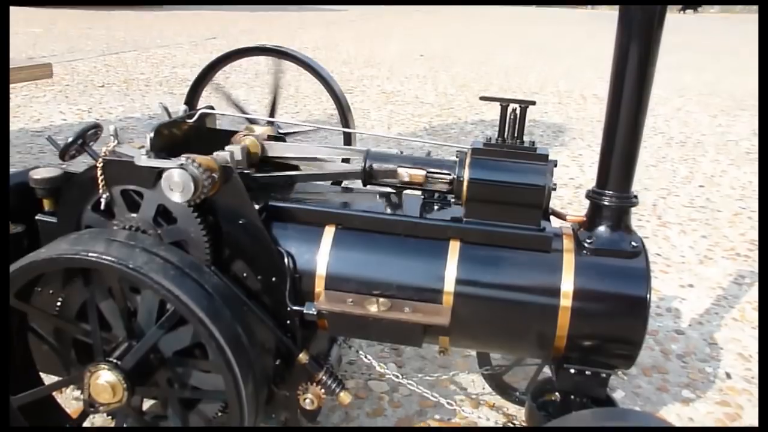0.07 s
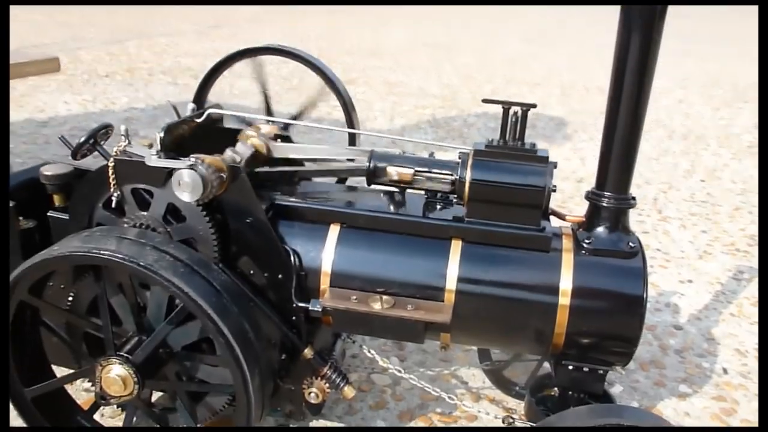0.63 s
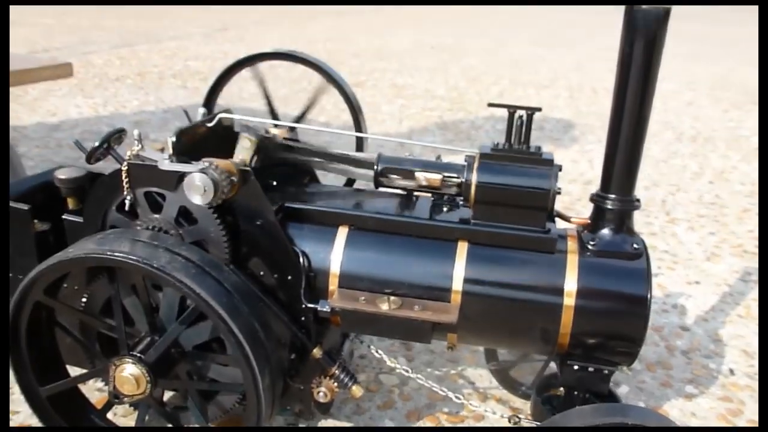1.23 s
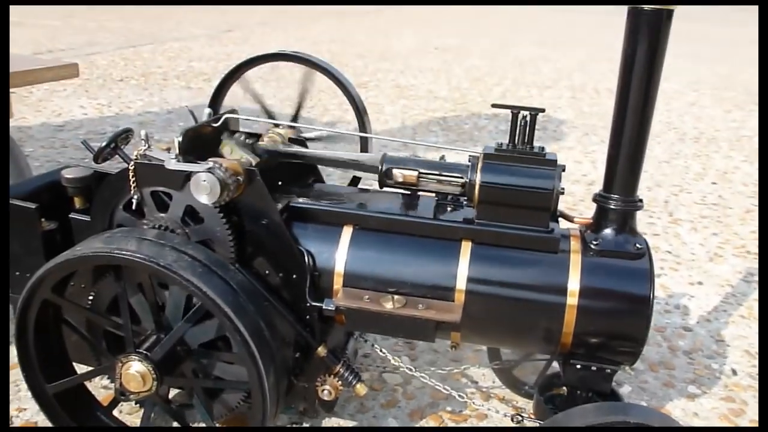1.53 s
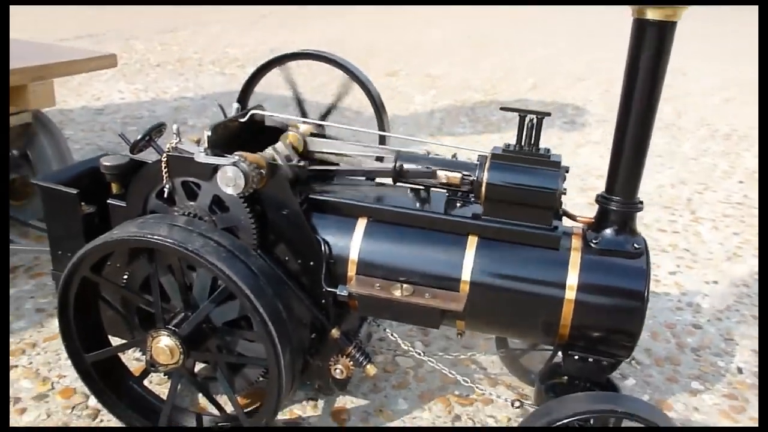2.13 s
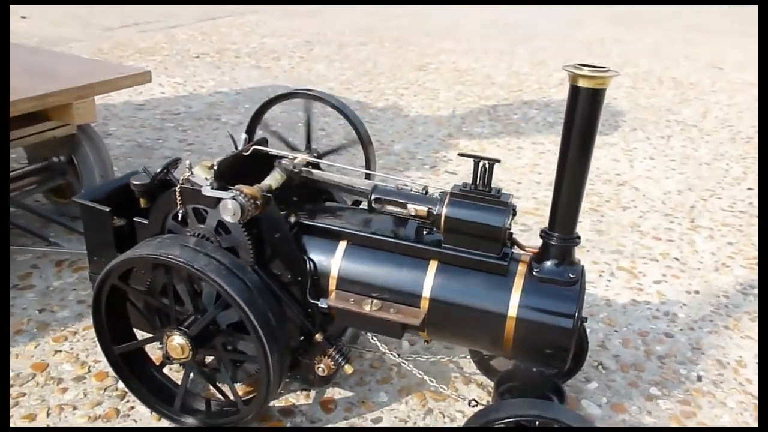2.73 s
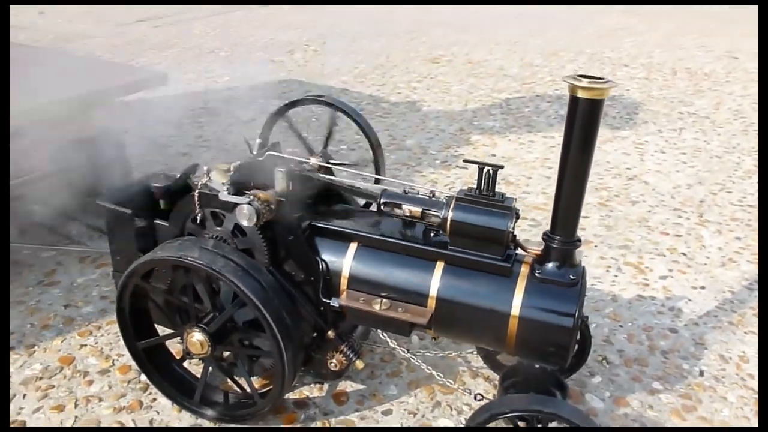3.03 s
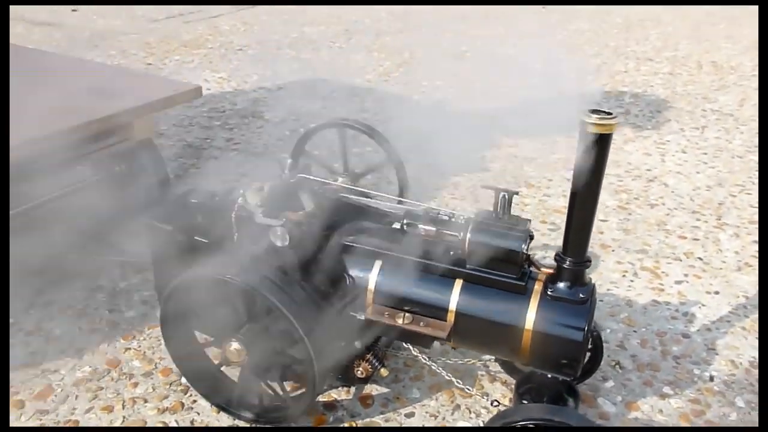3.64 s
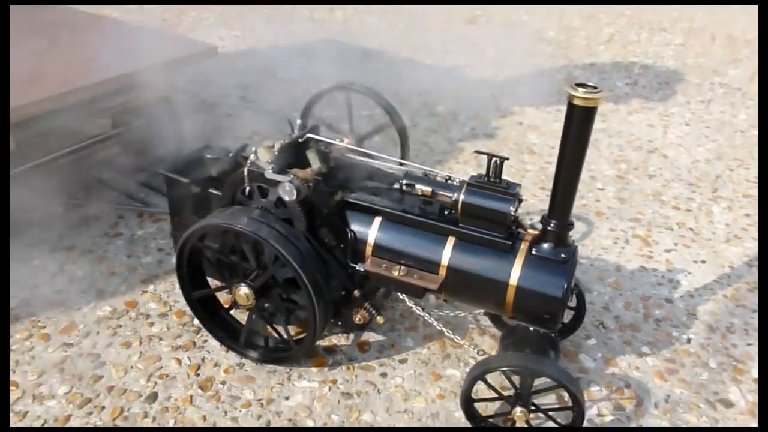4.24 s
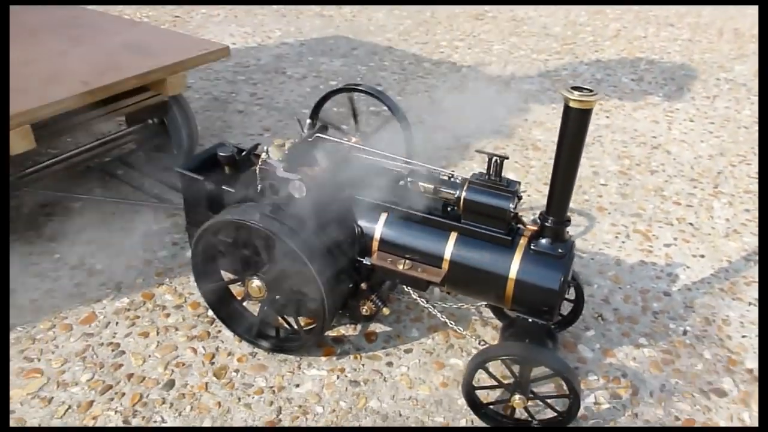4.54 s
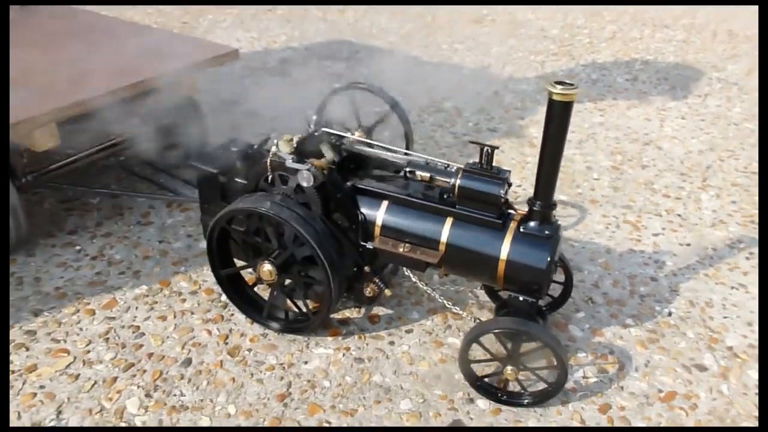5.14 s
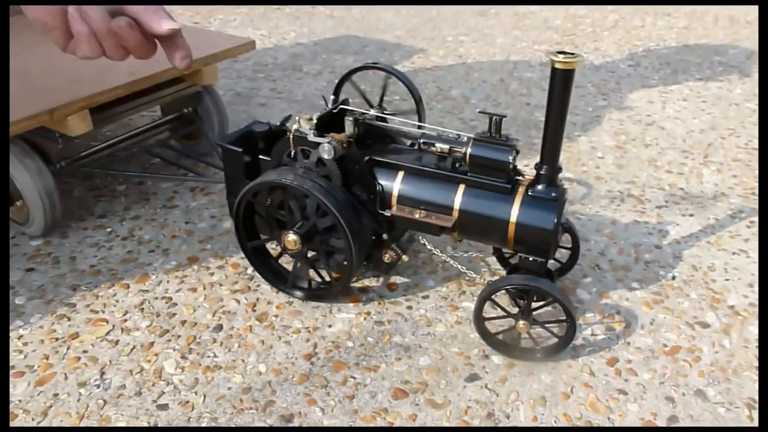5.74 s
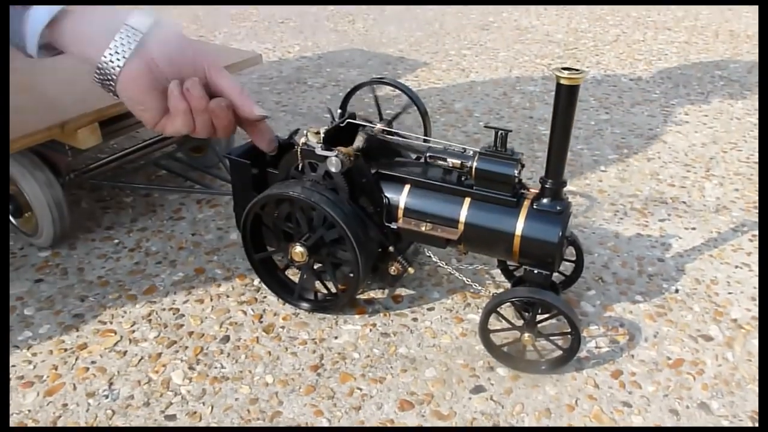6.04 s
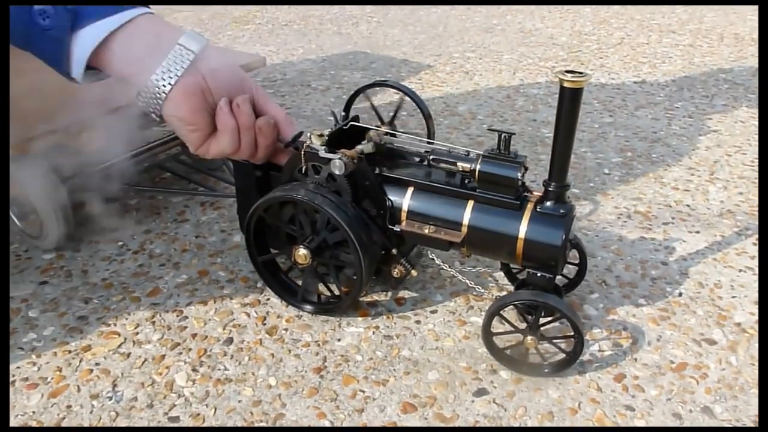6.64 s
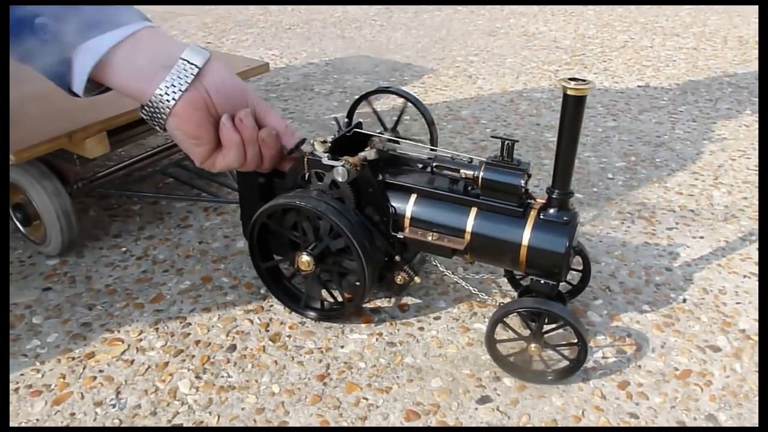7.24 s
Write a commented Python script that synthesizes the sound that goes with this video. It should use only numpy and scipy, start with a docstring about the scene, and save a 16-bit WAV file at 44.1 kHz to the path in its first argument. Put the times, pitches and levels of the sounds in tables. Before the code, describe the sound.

A gas burner roars and sings inside a model steam engine ticking over with rapid, spitting chuffs in a rising breeze.

```python
"""First you hear a gas burner roaring, hooting and singing in the flue of a small model traction engine.
Its gas jet hisses, and wet steam chuffs up the chimney twice a turn, spitting drops of water.
The engine ticks over outdoors and slowly gains a little speed; its loose rods click now and then.
A breeze grows into gusts that buffet the left and right microphones."""
import sys
import numpy as np
from scipy import signal
from scipy.fft import rfft, irfft
from scipy.io import wavfile

SR = 44100
rng = np.random.default_rng(int(sys.argv[2]) if len(sys.argv) > 2 else 0)


def dump(signal):
    """Clip the signal to [-1, 1] and save it as 16-bit WAV at the path in sys.argv[1]."""
    limited = np.clip(np.atleast_2d(signal).T, -1, 1)
    pcm = np.round(limited * 32767).astype(np.int16)
    wavfile.write(sys.argv[1], SR, pcm)


N = 329868
TIME = np.arange(N) / SR


def amp(db):
    """Turns decibels into a gain."""
    return 10 ** (np.asarray(db) / 20)


def unit(x):
    """Scales a signal to an average strength (rms) of 1."""
    return x / np.sqrt(np.mean(x ** 2) + 1e-20)


def curves(rows):
    """Joins the rows of a time table with straight lines, giving one curve for each value column."""
    seconds, *columns = np.transpose(rows)
    return [np.interp(TIME, seconds, column) for column in columns]


def along_hz(points):
    """Joins the rows of a frequency table into one curve, on a log frequency axis."""
    hz, value = np.transpose(points)
    return np.interp(np.log(np.fft.rfftfreq(N, 1 / SR) + 1), np.log(hz + 1), value)


def noise(points):
    """Noise of strength 1, coloured by a frequency table."""
    return unit(irfft(rfft(rng.standard_normal(N)) * amp(along_hz(points)), N))


def wander(rate_hz):
    """A random wobble of strength 1, mostly slower than the given rate."""
    rolloff = (1 + (np.fft.rfftfreq(N, 1 / SR) / rate_hz) ** 2) ** 2
    return unit(irfft(rfft(rng.standard_normal(N)) / rolloff, N))


def resonate(x, hz, width_hz):
    """A resonance whose pitch may move: shift the sound down to 0 Hz, smooth it, shift it back."""
    turn = np.exp(2j * np.pi * np.cumsum(hz * np.ones(N)) / SR)
    pole = np.exp(-np.pi * width_hz / SR)
    return 2 * (turn * signal.lfilter([1 - pole], [1, -pole], x / turn + 1e-18)).real


def ring(x, hz, width_hz, skirt_hz):
    """A narrow resonance, then a wider one that trims its sides."""
    return resonate(resonate(x, hz, width_hz), hz, skirt_hz)


def clicks(rows):
    """One click for each row of time and level."""
    seconds, db = np.transpose(rows)
    return np.bincount(np.clip(np.round(seconds * SR).astype(int), 0, N - 1), amp(db), N)


def bursts(rows, decay_s):
    """One short, dying puff of noise for each row of time and level."""
    out, t = np.zeros(N), np.arange(SR // 20) / SR
    for start, db in rows:
        puff = rng.standard_normal(len(t)) * np.exp(-t / decay_s)
        part = out[max(round(start * SR), 0):][:len(t)]
        part += (amp(db) * puff / np.linalg.norm(puff))[:len(part)]
    return out


def arches(rows):
    """One smooth rise and fall in gain for each row of middle time, length and level."""
    gains = (amp(db) * np.cos(np.pi * np.clip((TIME - middle) / length, -.5, .5))
             for middle, length, db in rows)
    return np.sqrt(sum(gain ** 2 for gain in gains))


# The flame sounds weaker as the listener backs away. Each row: time in seconds, roar in dB, hoot in dB.
FLAME = [(0, -28.5, -20), (1.2, -27, -18.5), (2.25, -28.5, -21), (2.62, -25.5, -18), (3.05, -28, -22),
         (3.7, -25.5, -18.5), (4.1, -27, -23), (4.28, -24, -20), (4.45, -29, -26.5), (4.62, -28.5, -28.5),
         (4.75, -29.5, -20), (5.2, -32, -27), (5.52, -30, -24), (5.8, -31, -26.5), (6.45, -32.5, -24.5),
         (6.9, -32.5, -26), (7.38, -31, -23.5), (7.48, -30.5, -25)]
# The colour of the roar. Each row: frequency in Hz, level in dB.
ROAR_COLOUR = [(20, -39), (50, -17.5), (120, -5.5), (200, -3.5), (290, 0), (480, -0.5), (720, 1.5),
               (1000, -8), (1150, -33.5), (1300, -12), (1480, -5.5), (1750, -32.5), (2500, -51.5),
               (8000, -58.5)]
# The flue's two notes sag slightly. Each row: time in seconds, hoot in Hz, singing note in Hz.
FLUE_NOTES = [(0, 863, 1527), (1.5, 861, 1523), (3, 854, 1508), (4.6, 855, 1519), (5.7, 861, 1521),
              (7.48, 861, 1525)]
# Brief, sharp-edged bursts of the low hoot. Each row: start in seconds, level in dB.
HOOT_ACCENTS = [(0.187, -17), (0.591, -20.5), (0.701, -19), (1.35, -17.5), (2.037, -12), (2.637, -21.5),
                (2.967, -15), (2.998, -15), (3.059, -18), (3.463, -16), (7.084, -14), (7.179, -16)]


def burner(roar_db=2, hoot_db=-1, accent_db=42, flicker_db=0.9):
    """The swirling flame roars and sounds a hoot, the lowest note of the flue (the tube it burns in)."""
    roar_level, hoot_level = curves(FLAME)
    hoot_hz, _ = curves(FLUE_NOTES)
    flicker = amp(flicker_db * wander(rate_hz=14))
    hoot = unit(ring(flicker * rng.standard_normal(N), hoot_hz, width_hz=60, skirt_hz=480))
    accents = amp(accent_db) * ring(clicks(HOOT_ACCENTS), hoot_hz, width_hz=90, skirt_hz=600)
    return noise(ROAR_COLOUR) * amp(roar_level + roar_db) + hoot * amp(hoot_level + hoot_db) + accents


# The flue's upper note hums on between swells. Each row: time in seconds, level in dB.
HUM = [(0, -27.5), (.7, -30), (1, -35), (1.45, -32), (2.4, -37), (2.88, -42), (3.4, -40.5), (3.95, -41),
       (4.3, -33.5), (4.55, -41.5), (5.05, -32), (5.27, -40), (5.55, -36), (5.8, -42), (6.05, -28.5),
       (6.35, -41.5), (6.6, -30.5), (7.48, -37)]
# Now and then it sings out. Each row: loudest moment in seconds, length in seconds, level in dB.
SWELLS = [(.03, 0.15, -22), (.14, 0.064, -20), (.225, 0.11, -24.5), (.36, .12, -21), (.51, .1, -20.5),
          (.62, 0.09, -22.5), (.72, 0.12, -24.5), (1.11, .07, -26.5), (1.65, 0.14, -30), (1.77, .08, -28.5),
          (1.95, 0.19, -30), (2.65, .06, -28), (3.29, 0.14, -27.5), (4.73, .06, -26.5),
          (4.845, 0.061, -19.5), (4.93, .12, -27), (5.09, .08, -28.5), (5.67, .08, -17), (5.94, 0.1, -28.5),
          (6.09, .08, -26.5), (6.22, 0.067, -24), (7.44, .08, -29)]


def singing_flue(hum_waver_db=2.5, pitch_waver=0.00501, flutter_db=3, fuzz_db=-10, octave_db=-15):
    """The flue's upper resonance almost keeps itself going: a fuzzy, wavering note that comes and goes."""
    hum_level, = curves(HUM)
    hum = amp(hum_level) * unit(amp(hum_waver_db * wander(rate_hz=20)))
    level = 20 * np.log10(np.hypot(hum, arches(SWELLS)))
    _, hz = curves(FLUE_NOTES)
    hz = hz * (1 + 0.000311 * (level - level.mean()))  # a little higher when driven harder
    cycles = np.cumsum(hz * (1 + pitch_waver * wander(rate_hz=45.6))) / SR
    tone = unit(np.sin(2 * np.pi * cycles) * amp(flutter_db * wander(rate_hz=54)))
    fuzz = unit(resonate(rng.standard_normal(N), hz, width_hz=150))
    note = resonate(amp(level) * (tone + amp(fuzz_db) * fuzz), hz, width_hz=150)
    octave = (signal.hilbert(note) ** 2).real  # strongest in the loudest swells
    return note + amp(octave_db) * octave


def flue_hollows(x, lower_depth=0.65, upper_depth=0.99):
    """Just below and above its singing note, the flue partly cancels the flame's sound."""
    x = x - lower_depth * resonate(x, hz=1390, width_hz=80)
    return x - upper_depth * resonate(x, hz=1700, width_hz=150)


# How loud the gas jet is. Each row: time in seconds, hiss in dB, whistle in dB.
JET_LEVELS = [(0, -60, -59.5), (1, -58, -60), (1.8, -61, -52.5), (2.4, -60.5, -47.5), (3, -54, -45),
              (3.7, -51, -45), (4.3, -55, -45.5), (4.5, -60, -48), (4.85, -50.5, -45), (5.3, -59, -50),
              (5.7, -55, -46.5), (6.6, -57.5, -46), (7.48, -53.5, -46)]
# The colour of its hiss. Each row: frequency in Hz, level in dB.
JET_COLOUR = [(800, -16), (1800, -13), (2500, -11), (3500, -0.5), (4400, 8.5), (5200, -0.5), (6500, -3),
              (8000, -6)]


def gas_jet(hiss_db=8, whistle_db=-2):
    """Gas rushes out of the jet with a hiss and one fuzzy whistle."""
    hiss_level, whistle_level = curves(JET_LEVELS)
    whistle = unit(ring(rng.standard_normal(N), hz=2890, width_hz=110, skirt_hz=400))
    return noise(JET_COLOUR) * amp(hiss_level + hiss_db) + whistle * amp(whistle_level + whistle_db)


# The engine gathers a little speed. Each row: time in seconds, chuffs per second.
SPEED = [(0, 11.337), (1, 11.091), (1.5, 12.002), (3.1, 12.528), (3.6, 13.564), (4.3, 13.134),
         (4.9, 13.288), (6, 13.946), (7.48, 12.917)]
# The pressure behind the chuffs. Each row: time in seconds, steam level in dB.
PRESSURE = [(0, -45.5), (1, -43.5), (1.6, -45.5), (2.2, -44), (2.5, -41), (2.9, -44.5), (3.35, -43),
            (4.05, -46), (4.25, -39), (4.5, -47), (4.8, -45), (5.4, -49.5), (6, -45.5), (6.65, -48),
            (7.48, -47.5)]


def steam_flow(leak, sharp_rise_s=0.0011, gentle_rise_s=0.012, hold_s=0.024, fall_s=0.064, shut_s=0.014):
    """Twice a turn a valve opens, the steam pressure holds and then sags, and the valve shuts."""
    rate, = curves(SPEED)
    level, = curves(PRESSURE)
    crank = (0.047 + np.cumsum(rate) / SR) % 2  # counted in strokes, two to a turn
    changeover = 0.964  # one end of the cylinder opens early and gently
    gentle = crank >= changeover
    age_s = (crank - gentle * changeover) / rate
    remaining_s = (np.where(gentle, 2, changeover) - crank) / rate
    opening = 1 - np.exp(-age_s / np.where(gentle, gentle_rise_s, sharp_rise_s))
    pressure = np.exp(-np.maximum(age_s - hold_s, 0) / fall_s)
    shutting = np.clip(remaining_s / shut_s, 0, 1) ** 2
    level = level - 0.05 * gentle + 0.7 * wander(rate_hz=12)  # the chuffs are slightly uneven
    return amp(level) * (leak + (1 - leak) * opening * pressure * shutting)


# The chimney's six resonances. Each row: frequency in Hz, width in Hz, level in dB.
CHIMNEY_RINGS = [(1930, 120, -12), (2257, 114, 1.5), (4295, 175, -0.5), (4550, 220, -11), (6374, 220, -8),
                 (6690, 250, -4.5)]
# The treble shifts as the listener moves. Each row: time in seconds, pitch factors for rings 3 and 6.
RING_DRIFT = [(0, 1.04, 1.03), (1.2, 1.04, 1.045), (2.1, 1.038, 1.035), (2.6, 1.02, 1.003),
              (3.2, 1.003, .968), (4.4, 1.003, .952), (5.1, 1.005, .962), (5.8, 1.005, 1.0),
              (7.48, 1.008, .992)]
# Its strength shifts too. Each row: time in seconds, dB added to rings 3, 5 and 6.
RING_LIFT = [(0, -3, 6, -7.5), (1.8, -5.5, 1, -4.5), (2.5, 1.5, -1, 2), (4.3, 1, -7, -5),
             (5.2, 0, -3.5, -1), (7.48, 0, -6, 0)]
# The colour of the sound that passes straight out. Each row: frequency in Hz, level in dB.
STEAM_COLOUR = [(1000, -25), (2000, -16.5), (3300, 8), (4300, -2), (5200, 7.5), (6000, 10.5), (7000, -1),
                (8000, 3.5)]


def chimney(x, direct_db=-18.5):
    """Steam and water set the chimney ringing; some of their sound passes straight out."""
    shift_3, shift_6 = curves(RING_DRIFT)
    lift_3, lift_5, lift_6 = curves(RING_LIFT)
    shifts = [1, 1, shift_3, 1, 1, shift_6]
    lifts = [0, 0, lift_3, 0, lift_5, lift_6]
    out = amp(direct_db) * irfft(rfft(x) * amp(along_hz(STEAM_COLOUR)), N)
    for (hz, width_hz, db), shift, lift in zip(CHIMNEY_RINGS, shifts, lifts):
        out += amp(db + lift) * ring(x, hz * shift, width_hz, skirt_hz=1300)
    return out


# Wet, leaky steam. Each row: time in seconds, crackle in dB, share of flow leaking between chuffs (0-1).
WETNESS = [(0, 0.5, 0.6), (1, -1, 0.56), (1.8, 0.5, 0.77), (2.1, -3, 0.32), (2.8, -5.5, 0.14),
           (3.3, 1.5, 0.23), (4.3, 0.5, 0.44), (4.55, -0.5, 0.33), (5.4, 3, 0.3), (6, 2.5, 0.4),
           (6.4, 2, 0.1), (7.48, 2, 0.2)]
# Big drops burst in the chimney. Each row: start in seconds, level in dB.
SPITS = [(1.2529, -14.5), (1.5851, -13), (1.7905, -20), (2.407, -15.5), (2.5206, -17.5), (3.0048, -16.5),
         (3.1208, -16), (3.4325, -18.5), (3.6676, -11), (3.7249, -16.5), (3.8158, -15.5), (3.9583, -13),
         (4.0892, -15.5), (4.2083, -8), (4.2434, -26.5), (4.2592, -7.5), (4.327, -11), (4.3552, -12.5),
         (4.803, -16.5), (5.7368, -23.5), (5.8165, -13.5), (6.0407, -17.5), (7.4552, -13.5)]
# Longer splutters of water. Each row: start in seconds, length in seconds, level in dB.
SPLUTTERS = [(1.253, 0.027, -32.5), (1.569, 0.05, -36), (1.783, .022, -32.5), (3.664, 0.051, -32.5),
             (4.181, 0.028, -40), (4.28, 0.03, -37), (4.33, 0.013, -37), (4.796, 0.011, -36),
             (6.198, 0.015, -32.5)]


def exhaust(steam_db=17.5, drops_per_s=170, drops_db=14.5, snap_db=19.5, spray_db=20, splutter_db=13):
    """Wet steam hisses and crackles with each chuff; larger drops spit and splutter."""
    crackle_level, leak = curves(WETNESS)
    size_db = 6 * np.minimum(rng.exponential(1, N), 2.8)  # many small droplets, a few large ones
    sizes = amp(size_db) * rng.choice([-1, 1], N)
    drops = unit(sizes * (rng.random(N) < drops_per_s / SR))
    flow = steam_flow(leak)
    chuffs = flow * (amp(steam_db) * rng.standard_normal(N) + amp(crackle_level + drops_db) * drops)
    water = sum(amp(db) * np.sqrt(np.sin(np.pi * np.clip((TIME - start) / length, 0, 1)).clip(0))
                for start, length, db in SPLUTTERS)
    rough_hiss = unit(rng.standard_normal(N) * amp(1.4 * wander(rate_hz=350)))
    splutters = amp(splutter_db) * water * rough_hiss
    spits = amp(snap_db) * clicks(SPITS) + amp(spray_db) * bursts(SPITS, decay_s=0.0091)
    return chimney(chuffs + splutters + spits)


# Sharp ticks from the moving rods. Each row: start in seconds, level in dB.
TICKS = [(.8383, -12), (1.0298, -24), (1.7589, -23), (3.0421, -22), (3.1608, -11.5), (3.6297, -25.5),
         (3.8597, -18.5), (4.3891, -19.5), (7.4653, -18.5)]


def rod_ticks(tick_db=19, rebound_s=0.0013, rebound_db=-10):
    """A loose rod takes up its slack with a dry tick and a quick rebound."""
    knocks = clicks(TICKS)
    rebounds = amp(rebound_db) * np.roll(knocks, round(rebound_s * SR))
    return amp(tick_db) * ring(knocks + rebounds, hz=3900, width_hz=1300, skirt_hz=3000)


# The breeze grows stronger. Each row: time in seconds, level in dB.
BREEZE = [(0, -59), (1.1, -63), (1.4, -49), (1.85, -44), (2.55, -52), (3.3, -53), (4.7, -41.5),
          (5.5, -42.5), (6.1, -34.5), (7.48, -38.5)]
# A light breeze only rumbles. Each row: frequency in Hz, level in dB.
BREEZE_COLOUR = [(15, -26), (30, -10), (55, -4), (100, -0.5), (170, -1.5), (280, -11), (450, -19),
                 (1400, -52), (4000, -72)]
# Single gusts. Each row: loudest moment in seconds, length in seconds, level in dB.
GUSTS = [(2.15, 0.32, -30), (2.86, 0.24, -33), (3.09, 0.1, -31.5), (3.38, 0.059, -37), (3.95, 0.38, -34.5),
         (4.44, 0.24, -25.5), (4.64, 0.13, -24), (4.97, 0.21, -30.5), (5.16, 0.14, -24), (5.32, 0.23, -25),
         (5.61, 0.14, -28.5), (5.82, 0.33, -27), (6.06, .12, -31), (6.28, 0.17, -30.5), (6.49, 0.15, -32),
         (6.68, 0.16, -28.5), (6.89, 0.14, -29.5), (7.06, 0.22, -33.5), (7.26, 0.072, -31.5),
         (7.46, 0.079, -32.5)]
# A gust's faster swirls reach higher in pitch. Each row: frequency in Hz, level in dB.
GUST_COLOUR = [(15, -36), (30, -20.5), (55, -11), (100, -2), (170, 1), (280, -3), (450, -11), (700, -16),
               (1400, -51.5), (4000, -71)]


def wind(breeze_db=4, gust_db=4.5, lumps_db=2.8, left_db=-2.1, right_db=0.25):
    """Both microphones feel the same breeze and gusts, but each is buffeted by its own swirls of air."""
    breeze_level, = curves(BREEZE)
    gusts, sides = arches(GUSTS), []
    for side_db in (left_db, right_db):
        lumps = unit(amp(lumps_db * wander(rate_hz=36)))
        rumble = amp(breeze_level + breeze_db) * noise(BREEZE_COLOUR)
        buffet = amp(gust_db) * gusts * noise(GUST_COLOUR)
        sides.append(amp(side_db) * lumps * (rumble + buffet))
    return np.array(sides)


# Which side hears the engine louder. Each row: frequency in Hz, left minus right in dB.
STEREO_BALANCE = [(100, -2.5), (500, -1.7), (900, -1.6), (1500, 0), (2000, 0.5), (2500, -3), (2900, -5.5),
                  (3400, -2.5), (5500, -1), (7500, -1.5)]
# Which side hears it first. Each row: frequency in Hz, the left side's lead in radians.
STEREO_PHASE = [(20, 0), (300, -0.12), (850, -0.49), (1300, -0.83), (1600, -0.75), (2200, -0.77),
                (3200, -0.72), (5000, -0.69), (6500, -0.51), (7500, 0.46)]


def scene():
    """The engine reaches the right side a little earlier and louder; wind blows on both sides."""
    flame = flue_hollows(burner() + singing_flue())
    engine = rfft(flame + gas_jet() + exhaust() + rod_ticks())
    half_difference = amp(along_hz(STEREO_BALANCE) / 2) * np.exp(.5j * along_hz(STEREO_PHASE))
    left = irfft(engine * half_difference, N)
    right = irfft(engine / half_difference, N)
    return np.array([left, right]) + wind()


def record(dry, soft_cut_hz=7300, steep_cut_hz=7650):
    """The highest treble is cut away, gently at first and then steeply."""
    soft = signal.firwin(101, soft_cut_hz, fs=SR)
    steep = signal.firwin(301, steep_cut_hz, window=("kaiser", 9), fs=SR)
    return signal.oaconvolve(dry, np.convolve(soft, steep)[None], "same", axes=1)


dry = scene()
out = record(dry)
dump(out)
```